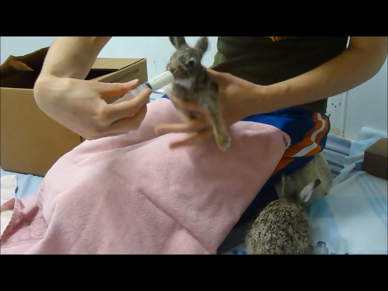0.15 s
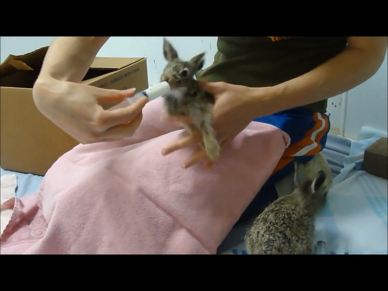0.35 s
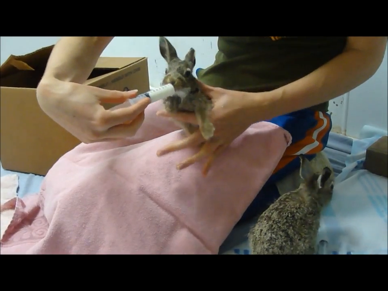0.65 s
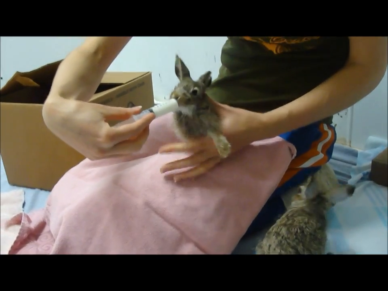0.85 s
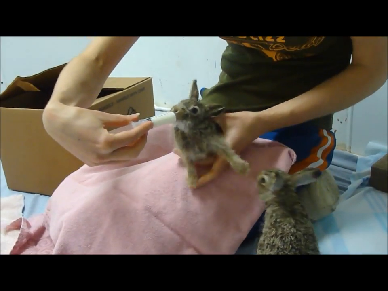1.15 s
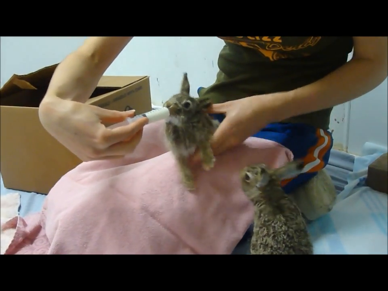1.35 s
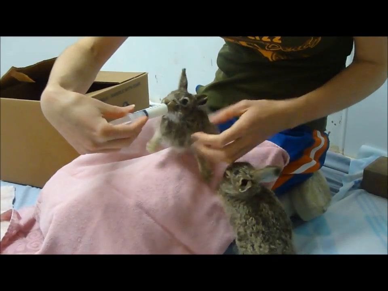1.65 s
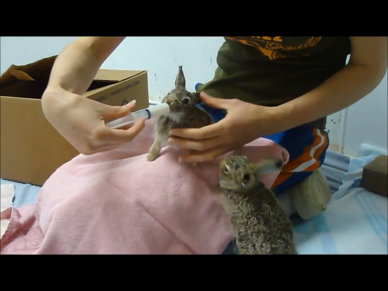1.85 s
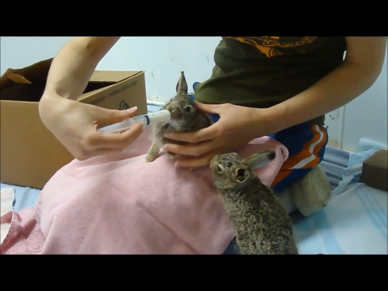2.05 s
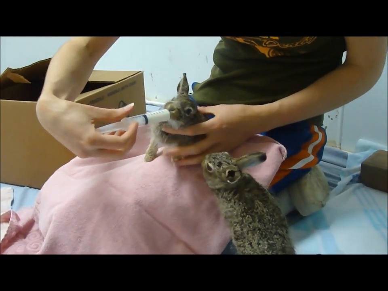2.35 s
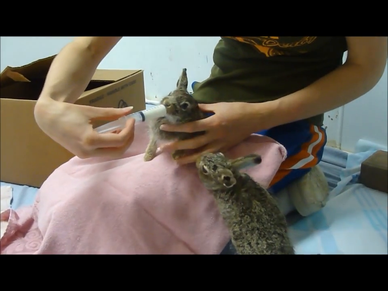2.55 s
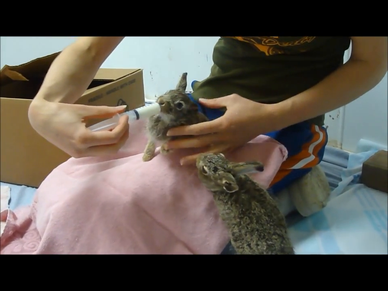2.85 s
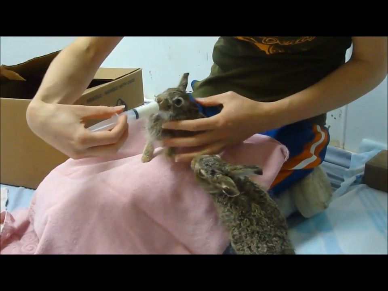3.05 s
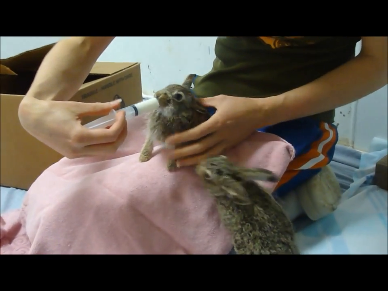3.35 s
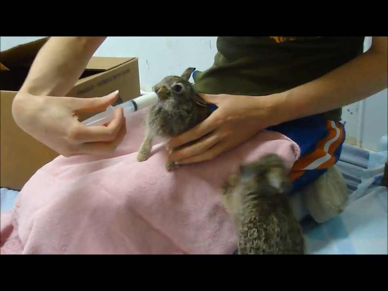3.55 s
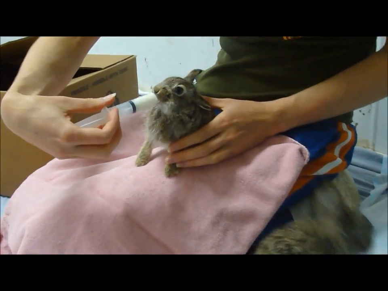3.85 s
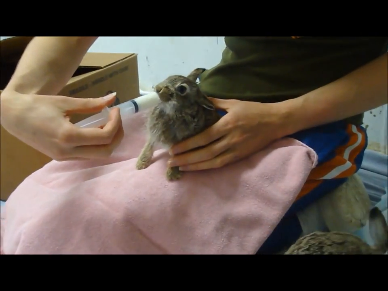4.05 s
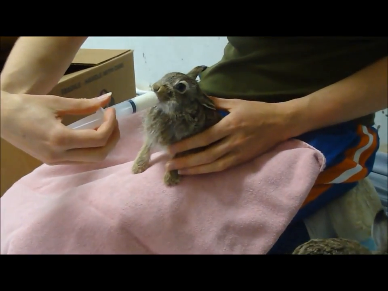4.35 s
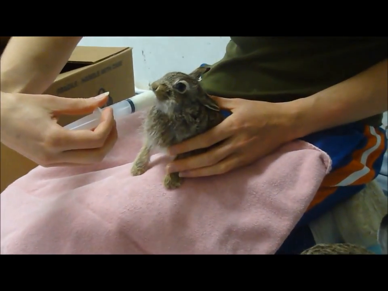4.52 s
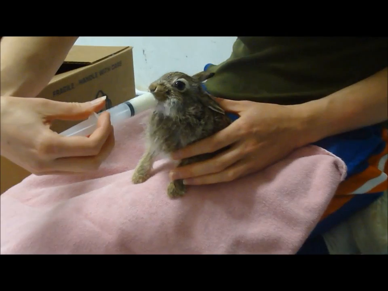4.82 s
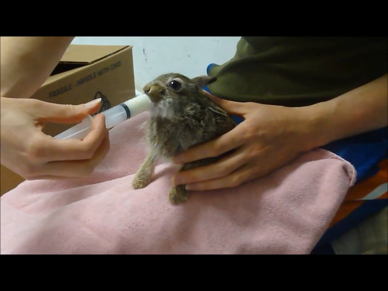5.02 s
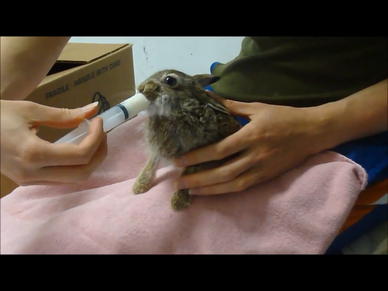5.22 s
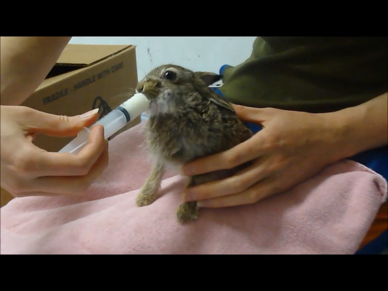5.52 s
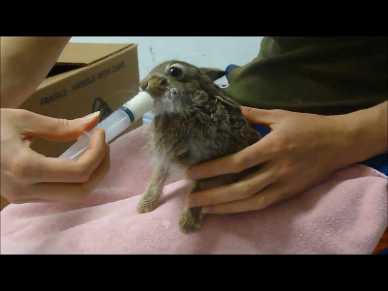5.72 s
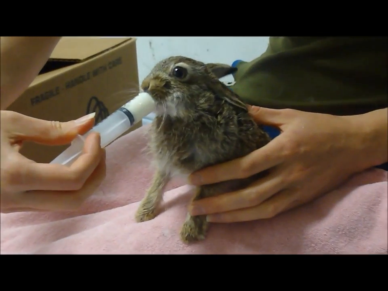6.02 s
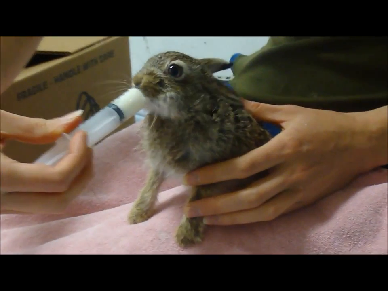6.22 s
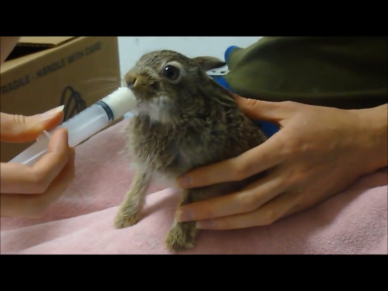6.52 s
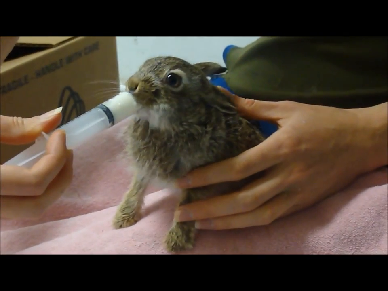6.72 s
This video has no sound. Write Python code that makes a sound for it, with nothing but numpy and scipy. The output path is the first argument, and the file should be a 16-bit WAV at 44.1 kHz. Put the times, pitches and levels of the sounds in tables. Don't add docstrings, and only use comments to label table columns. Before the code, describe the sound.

Close handling clicks and one hard crack, then a buzzy, rattling little gear motor runs steadily, snaps off and gives a brief settling whir.

```python
import sys
import numpy as np
from scipy import signal
from scipy.fft import rfft, irfft
from scipy.io import wavfile
from scipy.ndimage import uniform_filter1d

SR = 44100
rng = np.random.default_rng(int(sys.argv[2]) if len(sys.argv) > 2 else 0)


def field_ratio(decibels):
    return 10 ** (np.asarray(decibels, dtype=float) / 20)


def file_out(sig):
    cols = np.atleast_2d(sig).T
    lim = np.clip(cols, -1, 1)
    pcm = np.round(lim * 32767).astype(np.int16)
    wavfile.write(sys.argv[1], SR, pcm)


N = 303408

# f/Hz, density/dB per Hz
ROOM_AIR = [(20, -30), (85, -24), (140, -13), (330, -10.5), (550, -5.5), (890, -8.5), (1150, -18.5),
            (1500, -13.5), (2900, -17.5), (4000, -21.5), (9200, -26.5), (11500, -32.5)]
ROOM_AIR_DB = -48
# f/Hz, width/Hz, level/dB
FAN_TONES = [(151.4, 3.4, -69), (120, 6, -76.5), (190.6, 5.4, -70), (531, 14, -68), (1235, 163, -57),
             (2950, 62, -68.5), (4680, 720, -63)]

# t/s, peak level/dB, f/Hz, t60/s
RINGING_PARTS = [(0.434, -37, 1730, 0.036), (0.815, -20.5, 2930, 0.014), (1.362, -29, 850, 0.089),
                 (1.388, -40.5, 850, 0.61), (1.846, -35.5, 850, 0.16), (1.950, -33.5, 2950, 0.025),
                 (2.22, -84, 2930, .4), (6.337, -43, 56, 0.041), (6.35, -40, 850, 0.18),
                 (6.378, -41, 1270, 0.91), (6.385, -50, 3720, 0.3)]

# hardest moment t/s, build-up/s, fade/s, bright level/dB, dull re bright/dB
FINGER_RUBS = [(.955, .2, 0.45, -54, -8), (1.34, 0.13, 0.022, -47.5, 11), (1.392, .006, 0.057, -46, 17.5),
               (1.442, .06, 0.15, -54, 18), (1.496, .025, 0.073, -39, 4), (1.53, .03, 0.33, -55, 14.5),
               (1.614, .06, 0.081, -61, -3), (1.672, 0.069, 0.12, -49.5, 9), (1.8, .01, .15, -54, -3),
               (1.846, 0.27, 0.08, -53, -5), (1.87, .03, 0.42, -60, 19), (2.025, 0.037, 0.082, -39, -7),
               (2.075, .07, 0.22, -44, 8), (2.138, 0.2, .04, -57, -1.5), (2.171, .02, .04, -60, -6),
               (2.314, 0.088, .9, -57, 21), (6.352, 0.012, 0.6, -50, 11)]
# f/Hz, density/dB per Hz
SKIN_HISS = [(880, -45), (1500, -24), (1720, -6.5), (3150, -3.5), (3460, -6.5), (4390, -4.5), (5330, -6.5),
             (9300, -10), (11300, -14), (14700, -47), (22000, -120)]
# f/Hz, width/Hz, level/dB
DULL_SCRAPE = [(315, 420, -6), (810, 340, 3.5), (1220, 250, 4.5), (1840, 600, 1.5)]

# f/[struck part f], width/[struck part f], level/dB
STRUCK_PART = [(1, 0.64, 16), (1.5, 0.99, -9.5)]
# f/Hz, width/Hz, level/dB
SHELL_LOWS = [(325, 220, -14.5), (560, 600, 5.5), (850, 240, 8.5), (1194, 460, 10)]
SHELL_HIGHS = [(5220, 3950, 3), (6340, 1400, 7), (7540, 1800, -10), (9040, 670, 1), (10300, 1200, 1)]
# t/s, peak level/dB, struck part f/Hz, length/s
NAIL_TICKS = [(.347, -48, 4500, .0006), (.465, -48, 4500, .0006), (.592, -46, 4500, .0008),
              (.7585, -36.5, 2530, .0015), (0.813, -31.5, 3100, .0006), (1.327, -37, 4500, .003),
              (1.3737, -26, 2100, 0.0028), (1.4837, -36, 2500, .0017), (1.568, -37.5, 2580, 0.0021),
              (1.652, -31.5, 1500, .0012), (1.7923, -25.5, 3350, 0.0043), (2.133, -36.5, 1750, .0025),
              (2.264, -42, 4500, .001), (6.45, -38, 3900, .003), (6.513, -40, 3500, .001)]
FINGER_PAD_TAPS = [(1.35, -29, 2000, .003), (1.381, -17.5, 1610, 0.0014), (1.6147, -36, 2230, .0021),
                   (1.6578, -32.5, 1710, .0015), (1.838, -30, 2010, 0.0007), (1.843, -26.5, 1970, .0037),
                   (1.939, -31, 2040, 0.0016), (2.0474, -26, 2100, 0.0054), (3.953, -35.5, 2080, 0.0024),
                   (4.257, -52, 2150, .0016), (6.5809, -33, 2400, 0.0019)]
SMALL_PART_PINGS = [
    (1.8322, -26, 1970, 0.0026),
    (2.066, -25, 1710, 0.0026),
    (2.078, -33, 2000, .018),
    (2.7521, -32.5, 1960, .0015),
    (6.768, -34, 1880, 0.0018),
]
SHELL_CREAKS = [
    (1.344, -12.5, 2640, 0.0012),
    (1.358, -11.5, 2740, 0.003),
    (1.385, -12.5, 3660, 0.00081),
    (1.3888, -24.5, 2200, 0.002),
]
LEVER_SNAP_BACK = [
    (6.3366, -12.5, 1700, .0017),
    (6.3379, -9, 2770, 0.0036),
    (6.3407, -14.5, 3700, 0.0043),
    (6.343, -17, 2290, 0.0035),
]
# low re part/dB, high re part/dB
SHELL_SHAKES = [
    (-20, -3),
    (-5, -14.5),
    (-9, -30),
    (-10.5, -14.5),
    (-18.5, -4.5),
]

# t/s, peak level/dB, f/Hz, direction/[sign]
CATCH_SNAPS = [
    (1.3845, -1.5, 1300, -1),
    (1.8435, -17, 1500, 1),
    (2.0495, -19, 600, -1),
    (1.655, -36, 300, 1),
    (4.25, -33, 450, -1),
    (4.29, -37, 400, 1),
    (6.5825, -35, 600, -1),
    (1.3452, -27, 550, 1),
    (1.3585, -23, 550, 1),
    (6.339, -28, 650, 1),
]

SURGE_S, SURGE_RISE_S, SURGE_HOLD_S, SURGE_FADE_S, SURGE_DB = 2.254, 0.067, 0.077, 0.34, -43.5
SWING_DB = 40

# start t/s, stop t/s, spin-up/s, level/dB
MOTOR_RUNS = [
    (2.262, 6.34, .05, 0.2),
    (6.36, 6.492, 0.12, 3),
]
SPIN_DOWN_S = .016
TURN_HZ, TURN_START_S = 24.93, 2.261
MESH_HZ = 694
ROTOR_RIPPLE = [(1, .024, .42), (2, .015, .28), (3, .028, .1)]
# place/[turns], width/[turns], frame, barrel, gear box and rattle level/dB
MESH_KNOCKS = [(0, .06, -8, 8, -4, 3), (.12, .05, 0, -6, 0, -2), (.3, .06, 2, 6, -1, -4),
               (.46, .05, 0, -8, -8, 0), (.64, .05, -8, 1, 4, -4), (.76, .06, 2, -4, -6, -4)]
# f/Hz, width/Hz, level/dB
FRAME_MODES = [(760, 170, 14), (1220, 130, 2), (1314, 79, 10.5), (1500, 170, 7)]
BARREL_MODES = [(1890, 74, 2), (2010, 290, -4), (2243, 240, 10.5)]
GEARBOX_MODES = [(2400, 37, 1), (2568, 108, 3.5), (2710, 540, -10.5), (3055, 86, 0), (3400, 64, -12)]
RATTLE_MODES = [(3913, 360, 6), (4360, 650, 0), (4787, 830, -1.5), (5430, 600, -7.5), (5830, 490, 4),
                (7500, 2600, -11), (8520, 93, -5.5), (9900, 2900, -10)]
# running level/dB, drift/dB per s, break-loose jolt/dB, slack until gears seat/dB
PART_LOADS = [
    (-46.5, -1.34, 8, -6.5),
    (-47, 0.43, 5.5, -9),
    (-51.5, 0.92, 7.5, -3.5),
    (-48.5, 0.36, 2, 5.2),
]
JOLT_S, SEAT_S = 0.16, 0.56
# level/dB, in part order
CLUMP_DB = (.6, .3, .4, 1.3)
CLUMPS_PER_S = 70
IDLE_DRIVE = (.8, .6, .9, .8)


def level(x, db):
    return x * field_ratio(db) / np.sqrt(np.mean(x ** 2))


def band(x, hz, width):
    return signal.lfilter(*signal.iirpeak(hz, hz / width, fs=SR), x)


def body(x, modes, steep=False):
    out = 0
    for k, (hz, width, db) in enumerate(modes):
        if steep:
            width = 1.28 * width
            mode = band(band(x, hz, width), hz, width)
        else:
            mode = band(x, hz, width)
        out = out + (-1) ** k * field_ratio(db) * mode
    return out


def colour(points):
    hz, db = np.transpose(points)
    bins_hz = np.arange(N // 2 + 1) * SR / N
    gain = field_ratio(np.interp(np.log(bins_hz + 1), np.log(hz), db))
    return level(irfft(rfft(rng.standard_normal(N)) * gain, N), 0)


def walk(rate):
    k = int(SR / rate)
    held = np.repeat(rng.standard_normal(N // k + 1), k)
    return 1.3 * uniform_filter1d(uniform_filter1d(held, k), k)[:N]


def swell_db(s, rise, hold, fade):
    corners = np.cumsum([s, rise, hold, fade])
    return np.interp(np.arange(N) / SR, corners, [-SWING_DB, 0, 0, -SWING_DB], left=-120, right=-120)


def room():
    fan = sum(level(band(rng.standard_normal(N), hz, width), db) for hz, width, db in FAN_TONES)
    phase = 2 * np.pi * 410 * np.arange(N) / SR + 0.75 * walk(4)
    hum = level(field_ratio(2.2 * walk(4.06)) * np.sin(phase), -57.0)
    breath = field_ratio(.5 * walk(4.3) + 0.55 * walk(24.99))
    return level(colour(ROOM_AIR) * breath, ROOM_AIR_DB) + fan + hum


def rings():
    rise_s, touch_s, damp_s = 0.0023, .12, 0.053
    out, waver = np.zeros(N), field_ratio(0.6 * walk(60))
    for s, db, hz, t60 in RINGING_PARTS:
        start = int(s * SR)
        t = np.arange(N - start) / SR
        t = t[:int(touch_s * SR)]
        damping = np.clip((t[-1] - t) / damp_s, 0, 1)
        decay = field_ratio(db - 60 * t / t60) * (1 - np.exp(-t / rise_s))
        out[start:][:len(t)] += damping * decay * np.sin(2 * np.pi * hz * t)
    return out * waver


def rubs():
    hiss = level(colour(SKIN_HISS) * field_ratio(2.5 * walk(180)), 3.64)
    grit = rng.standard_normal(N) * field_ratio(2 * walk(120))
    scrape = level(body(grit, DULL_SCRAPE, steep=True), -10.5)
    out = 0
    for s, rise, fade, bright_db, dull_db in FINGER_RUBS:
        stroke = field_ratio(bright_db + swell_db(s - rise, rise, 0, fade))
        out = out + stroke * (hiss + field_ratio(dull_db) * scrape)
    return out


def clicks():
    boost_db, treble_share = 6.0, .6
    out, t = np.zeros(N), np.arange(2048) / SR
    kinds = (NAIL_TICKS, FINGER_PAD_TAPS, SMALL_PART_PINGS, SHELL_CREAKS, LEVER_SNAP_BACK)
    for rows, (low_db, high_db) in zip(kinds, SHELL_SHAKES):
        slips = rng.standard_normal((len(rows), len(t)))
        for (s, part_db, hz, length), slip in zip(rows, slips):
            part = [(hz * m, hz * w, db) for m, w, db in STRUCK_PART]
            layers = ((0, part, 1), (low_db + boost_db, SHELL_LOWS, 1),
                      (high_db + boost_db, SHELL_HIGHS, treble_share))
            for db, modes, share in layers:
                decay = np.exp(-t / max(length * share, .0002))
                ring = body(slip * decay, modes, steep=True)
                out[int(s * SR):][:len(t)] += ring / np.abs(ring).max() * field_ratio(part_db + db)
    return out


def snaps():
    out, t = np.zeros(N), np.arange(-128, 128) / SR
    for s, db, hz, way in CATCH_SNAPS:
        u = (np.pi * hz * t) ** 2
        swing = (1 - 2 * u) * np.exp(-u)
        edge = (1 + .3 * np.cos(5 * np.pi * hz * t)) / 1.3
        out[int(s * SR) - 128:][:len(t)] += np.sign(way) * field_ratio(db) * swing * edge
    return out


def surge():
    grit = rng.standard_normal(N) * field_ratio(1.9 * walk(300))
    swell = field_ratio(SURGE_DB + swell_db(SURGE_S, SURGE_RISE_S, SURGE_HOLD_S, SURGE_FADE_S))
    return swell * level(body(grit, DULL_SCRAPE, steep=True), 0)


def effort():
    t = np.arange(N) / SR
    since = np.maximum(t - MOTOR_RUNS[0][0], 0)
    power = 0
    for s, stop, rise, db in MOTOR_RUNS:
        spin_up = np.clip((t - s) / rise, 0, 1)
        spin_down = np.clip(1 - (t - stop) / SPIN_DOWN_S, 0, 1)
        power = power + field_ratio(db) * spin_up * spin_down
    jolting, unseated = np.exp(-(since / JOLT_S) ** 2 / 2), np.exp(-since / SEAT_S)
    return [power * field_ratio(db + drift * since + jolt * jolting + slack * unseated)
            for db, drift, jolt, slack in PART_LOADS]


def motor():
    wander, wobble = .012, .012
    turn = (np.arange(N) / SR - TURN_START_S) * TURN_HZ + wobble * walk(11)
    ripple = sum(depth * np.cos(2 * np.pi * n * (turn - place)) for n, depth, place in ROTOR_RIPPLE)
    speed = 1 + ripple + wander * walk(90)
    mesh = 2 * np.pi * np.cumsum(MESH_HZ * speed) / SR
    teeth = level(sum(np.cos(k * mesh) for k in range(2, 10)), 9)
    out = 0
    chatter_db, rough_dbs = (9, 11, 14, 17), (2.1, 0.97, 0.26, 2.37)
    part_modes = (FRAME_MODES, BARREL_MODES, GEARBOX_MODES, RATTLE_MODES)
    parts = zip(part_modes, effort(), chatter_db, rough_dbs)
    for k, (modes, gain, loose_db, rough_db) in enumerate(parts):
        chatter = field_ratio(loose_db) * rng.standard_normal(N)
        roughness = field_ratio(rough_db * walk(400) + CLUMP_DB[k] * walk(CLUMPS_PER_S))
        drive = (teeth + chatter) * roughness
        swell = IDLE_DRIVE[k]
        for row in MESH_KNOCKS:
            away = (turn - row[0] + .5) % 1 - .5
            swell = swell + field_ratio(row[2 + k]) * np.exp(-.5 * (away / row[1]) ** 2)
        out = out + gain * level(body(drive * swell, modes, steep=True), 0)
    return out


def scene():
    return (room() + rings() + rubs() + clicks() + snaps() + surge() + motor())[None]


def band_limit(x):
    return signal.sosfilt(signal.butter(12, 12020, fs=SR, output="sos"), x)


def record(dry):
    top_hz = 10990
    low_pass = signal.ellip(16, .3, 60, top_hz, fs=SR, output="sos")
    return band_limit(signal.sosfilt(low_pass, dry))


dry = scene()
out = record(dry)
file_out(out)
```